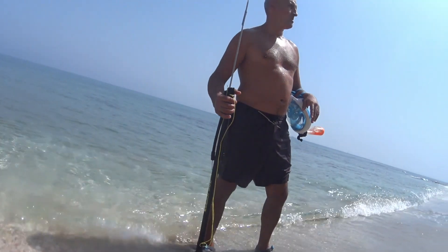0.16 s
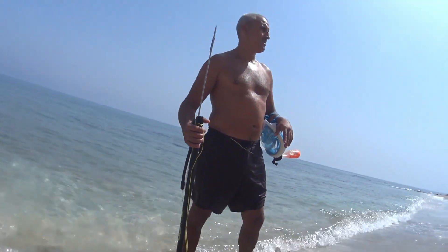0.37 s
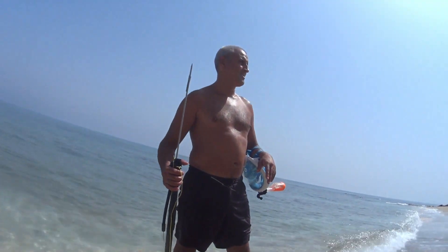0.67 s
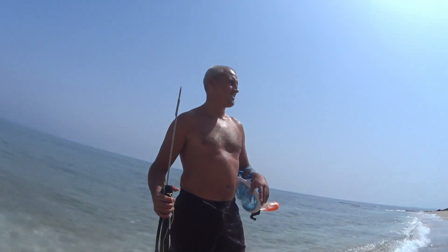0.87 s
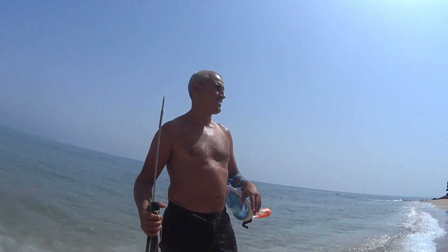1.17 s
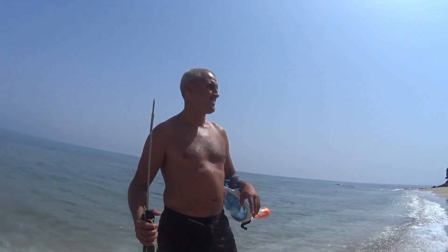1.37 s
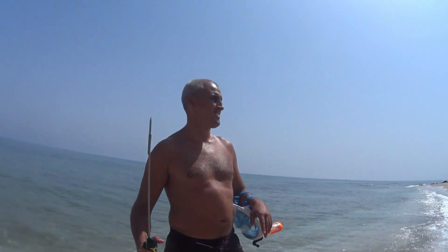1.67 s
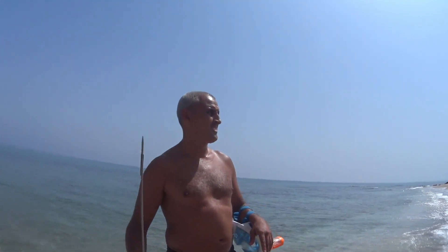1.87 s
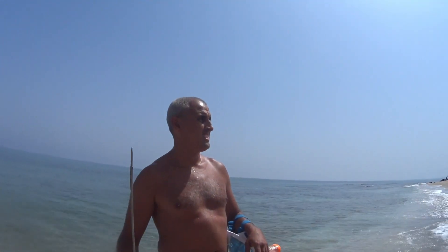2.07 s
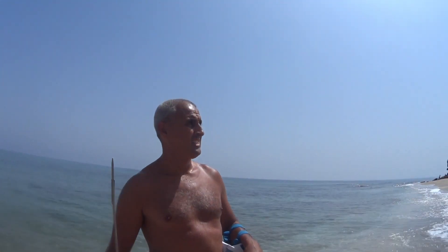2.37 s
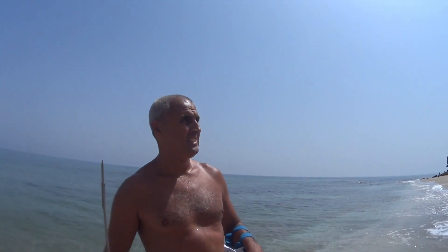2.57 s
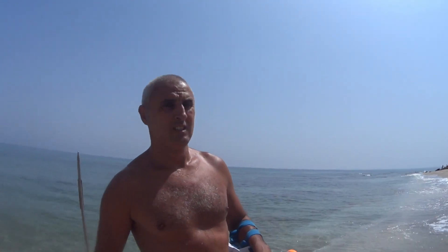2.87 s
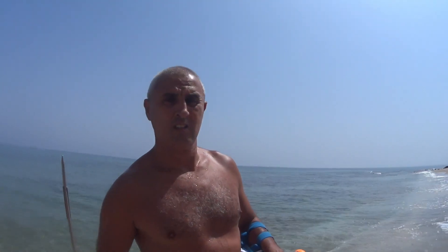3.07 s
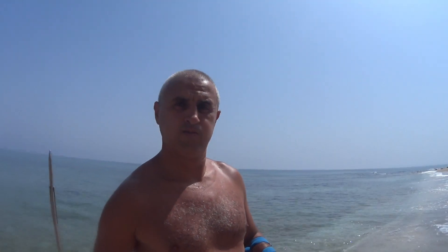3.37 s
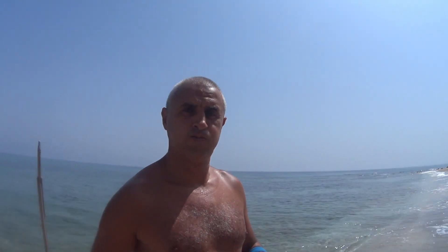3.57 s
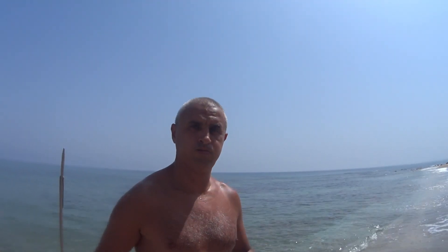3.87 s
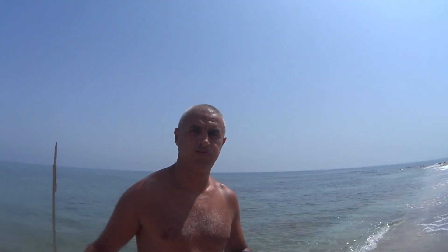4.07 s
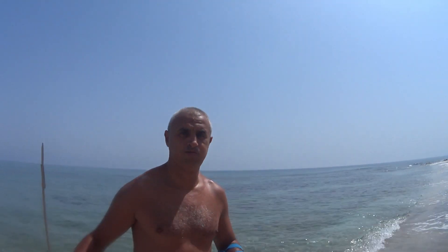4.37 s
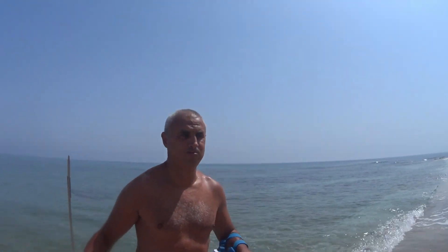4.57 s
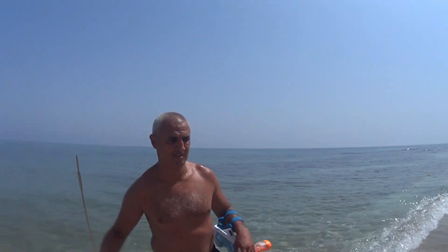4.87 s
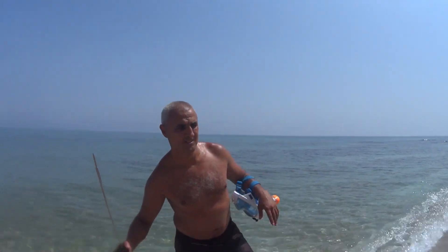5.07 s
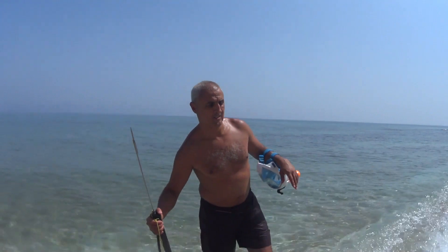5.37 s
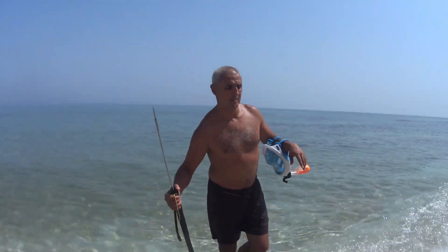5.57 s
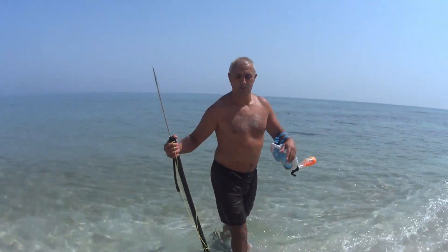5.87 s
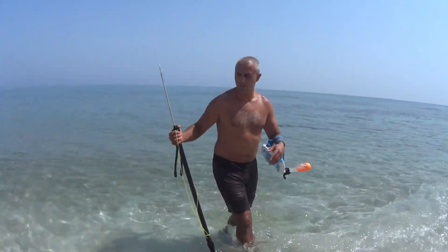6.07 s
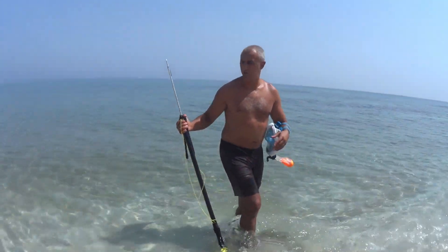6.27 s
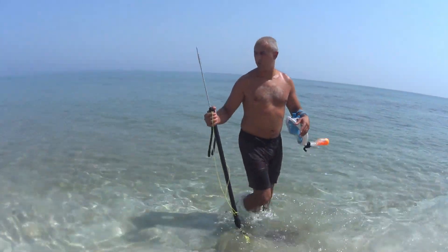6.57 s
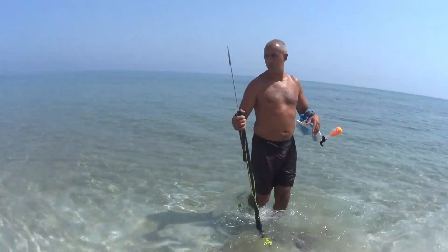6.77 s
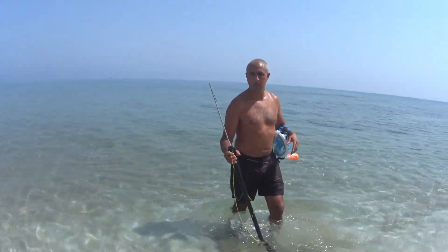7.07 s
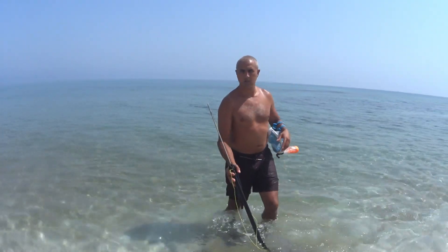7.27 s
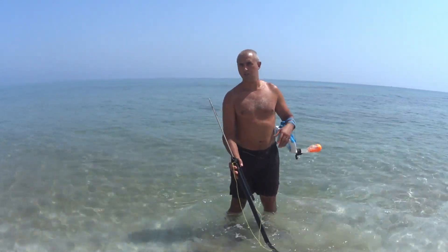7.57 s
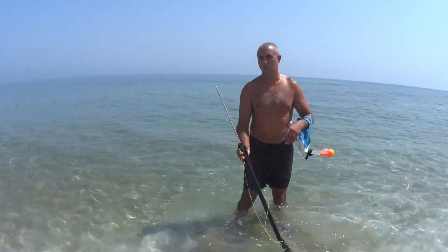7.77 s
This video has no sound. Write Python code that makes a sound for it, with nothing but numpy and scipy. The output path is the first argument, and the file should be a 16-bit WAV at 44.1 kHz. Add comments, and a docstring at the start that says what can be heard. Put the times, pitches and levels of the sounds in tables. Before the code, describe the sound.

A small wave breaks and drains on open sandy shore, then close splashing wading steps, gear clicks and clinks, and a second gentle wave near five seconds.

```python
"""A small wave breaks at once on a sandy beach, runs up and drains back: swarms of bubbles over filtered noise.
From about two seconds a man with a spear gun and a mask wades in: water slaps (noise bursts), gulps (rising
sines) and sloshes (bubbles) round his legs, his gear clicks and clinks, and the hand-held camera bumps softly.
Near five seconds a second wave breaks, and more strides, slaps and clicks follow as it drains.
Surf, sloshing, slaps and clicks are coloured by the two resonant microphone ports of the camera's housing."""
import sys
import numpy as np
from scipy import signal
from scipy.fft import rfft, irfft, next_fast_len
from scipy.io import wavfile
from scipy.ndimage import uniform_filter1d, map_coordinates

SR = 44100
rng = np.random.default_rng(int(sys.argv[2]) if len(sys.argv) > 2 else 0)


def inscribe(sig):
    """Save sig as 16-bit PCM at rate SR to the path in sys.argv[1].

    A 1-D sig is mono; a 2-D sig holds one channel per row.
    Samples are clipped to [-1, 1] before scaling.
    """
    pcm = np.round(np.clip(np.atleast_2d(sig).T, -1, 1) * 32767)
    wavfile.write(sys.argv[1], SR, pcm.astype(np.int16))


N = 348831

# waves on the sand: break_s, run_up_s, crest_db, ebb_db_per_s
WAVES = [(0.37, 0.82, -29, 24.5), (4.67, 1.155, -29.5, 13)]
# what a wave stirs up: share_db (against the wave at its crest), growth_db_per_db (of the wave),
# early_s (by which it comes and goes early)
CHURN_LAW = (-14, 1.1, 0.084)
WASH_LAW = (-1.13, 0.98, 0.029)
FIZZ_LAW = (-5.5, 1.077, 0.074)
FAR_LAW = (-16.5, 0.27, 0.13)

# colour of large bubbles, in surf and gurgles: freq_hz, level_db
CHURN_SPECTRUM = [(40, -30), (100, 6), (135, -5), (200, -3.5), (400, -0.5), (1050, 6.5), (1350, -20),
                  (2000, -28)]
# colour of small bubbles in the surf: freq_hz, level_db
WASH_SPECTRUM = [(600, -21), (1000, -13), (1350, 2), (1800, -4), (2800, -5.5), (3600, -9), (5500, -4),
                 (11000, -44)]
# colour of foam and fine spray: freq_hz, level_db
FIZZ_SPECTRUM = [(1500, -31), (2800, -8), (3800, -1), (5000, 1.5), (7500, 1.5), (11000, 1.5)]
# dull hush of surf farther along the shore: freq_hz, level_db
FAR_SPECTRUM = [(150, -4.5), (400, 0.5), (800, 3), (1350, 4), (1800, 3.5), (2500, -9), (4000, -3.5),
                (6000, 0.5), (11000, -2.5)]
# low handling rumble: freq_hz, level_db
RUMBLE_SPECTRUM = [(15, -18), (30, -1), (60, -3.5), (120, -6.5), (250, -9), (600, -21.5), (1500, -31)]
# dull bump on the housing: freq_hz, level_db
THUD_SPECTRUM = [(20, -16), (50, -3), (85, 2.5), (130, -3), (220, -22), (600, -35), (2000, -70)]
# dry contact of the gear: freq_hz, level_db
PLASTIC_SPECTRUM = [(500, -15), (1700, -11), (2400, -2), (3200, -11), (4350, 2.5), (5500, -1), (11000, -5)]
# drops thrown by a slap: freq_hz, level_db
SPATTER_SPECTRUM = [(200, -24), (800, -6.5), (1800, 8.5), (2700, 1), (3600, -5.5), (4500, -4),
                    (6000, -10.5), (11000, -23)]
# close bubbles round the legs: freq_hz, level_db
SLOSH_SPECTRUM = [(300, -24), (1000, -7), (1500, -10.5), (2000, -11), (2800, -8), (3600, -11.5),
                  (4500, -0.5), (5500, 2), (11000, -3.5)]

# resonant colour of the microphone ports: freq_hz, left_db, right_db
PORT_RESPONSE = [(95, -20.5, -15.5), (384, -3.5, -5), (720, -8, -4.5), (1040, -9.5, -10.5),
                 (1326, -14, -10.5), (1675, -9, -3.5), (1794, 2, 1), (2190, -1, -1), (2470, -1.5, 2.5),
                 (3060, -4, -7), (3920, -1, -0.5), (4455, -1, -1.5), (5120, -10.5, -10.5), (5820, -7, -5),
                 (7330, -12.5, -4), (8100, -21.5, -11), (8630, -21, -6.5), (9680, -24.5, -10.5),
                 (11700, -26, -15.5)]
# how the ports agree on the surf along the shore: freq_hz, coherence (0 to 1), left_lead_rad
SHORE = [(450, .9, 0), (850, .43, .9), (1150, .34, -.8), (1450, .69, .9), (1800, .95, .1), (2500, .86, .3),
         (2900, .1, 0), (3600, .5, 4), (4400, .7, 3.2), (5100, .34, 3.5), (5800, .87, 3.4),
         (7300, .73, 2.1), (9000, .62, 1.5), (10200, .36, -2.9)]
# how they agree on sounds in front: freq_hz, coherence (0 to 1), left_lead_rad
AHEAD = [(400, .5, .1), (1350, .3, -1.1), (1750, .96, .1), (2550, .92, .5), (3100, .45, -.1),
         (4400, .78, -1.6), (5200, .55, -2.2), (6000, .83, -3.2), (7500, .62, -4.2), (9000, .52, -4.9),
         (10200, .2, -8.8)]

# bumps on the housing: start_s, peak_db
BUMPS = [(1.801, -46), (1.927, -52), (2.489, -55), (2.604, -50), (3.071, -48), (3.177, -49), (3.664, -53),
         (3.836, -50), (5.708, -42.5), (6.203, -47.5), (6.367, -49), (6.759, -45), (7.587, -47)]
# dry clicks of the gear: start_s, peak_db, t60_s
CLICKS = [(2.414, -33.5, .014), (3.215, -41, .012), (3.857, -40, .02), (6.554, -26.5, 0.073),
          (6.5996, -18, 0.013), (6.836, -26, 0.061), (6.934, -33, .017), (7.046, -34, 0.011)]
# clinks of the steel spear: start_s, level_db, pitch_hz, t60_s, left_minus_right_db, hardness_db_per_octave
CLINKS = [(2.265, -28, 4470, 0.041, 2, 1), (3.388, -30.5, 3870, 0.048, -20, -1.5),
          (3.862, -25.5, 3890, 0.04, -13, -3), (4.016, -39, 3760, .05, -5, -10),
          (6.841, -20, 3760, 0.053, 19.5, 2)]
# modes of the spear: pitch_ratio, level_db, t60_share
STEEL_MODES = [(0.998, -7.5, 1.26), (0.995, -26, 4.5), (1.036, -8, 0.79), (1.09, -6.5, 0.32),
               (1.99, -24.5, .7), (2.79, -18, 0.57)]
# largest pockets of trapped air: start_s, level_db, pitch_hz (at the start)
GULPS = [(2.413, -29, 2090), (2.467, -30, 1144), (2.505, -34.5, 1310), (2.634, -39.5, 485),
         (4.276, -37, 736), (4.311, -39.5, 330), (4.433, -25.5, 1270), (4.51, -35, 543), (4.597, -30, 363),
         (4.637, -36, 455), (4.698, -27, 347), (4.715, -33, 460), (4.732, -32, 422), (7.861, -32.5, 1245),
         (7.884, -37, 503)]
# loudest slaps of water: slap_s, level_db, spray_db (against level_db), t60_s
SLAPS = [(1.961, -31, -7, 0.045), (2.081, -26, -15, .05), (2.298, -24, -18, 0.017),
         (2.369, -26, -10.5, 0.15), (2.414, -29, -9, .035), (2.468, -28.5, -10, 0.21),
         (2.701, -28.5, -25, 0.029), (2.854, -25.5, -21, 0.084), (2.897, -31.5, -30, 0.043),
         (3.2, -42.5, -14, .04), (4.164, -30.5, -2.5, 0.036), (4.305, -26.5, -25, .035),
         (4.434, -22, -2, 0.21), (4.705, -20.5, -5.5, 0.19), (6.682, -28, -22, .06),
         (7.089, -29, -26, 0.033), (7.331, -24, -27, 0.042), (7.396, -22, -22, .1),
         (7.464, -24.5, -18, 0.12), (7.863, -28.5, -36, 0.046)]
# strides through the shallows: fastest_s, slosh_db, swing_s, gurgle_db
STRIDES = [(2.12, -52, 0.29, -77), (2.5, -45.5, .45, -65), (2.865, -42, 0.31, -59), (6.45, -64, .4, -53),
           (6.78, -47, 0.6, -54), (7.09, -57, 0.17, -56), (7.5, -39, 0.43, -52.5)]

BUILD_DB_PER_S = 24  # a wave grows as it steepens towards the break
SWELL_DB, SWELL_S = 5, 0.56  # it breaks this far under its crest; time constant of the spreading foam
TURN_S = 0.42  # the water takes this long to turn back
BACKWASH_DB, BACKWASH_DB_PER_S = -16.5, 6  # draining water: level under the wave, fading as the wave ebbs
GULP_T60_S, GULP_HZ, GULP_DAMPING = 0.069, 350, 0.35  # ring time at this pitch; power shortening higher ones
SWING_DB, SETTLE_DB_PER_S = 14, 110  # the stir grows by this much over a swing, then settles
GURGLES_PER_S = 60  # air pockets that a leg drags under, per second in both streams together
TOP_HZ = 11060  # band limit of the camera


def amp(db):
    """Decibels to gain."""
    return 10 ** (np.asarray(db) / 20)


def unit(x):
    """x at rms 1."""
    return x / np.sqrt(np.mean(x ** 2) + 1e-20)


def at_peak(x, db):
    """x scaled so that its loudest two milliseconds have this level."""
    loudest = uniform_filter1d(np.mean(x ** 2, 0), SR // 500).max()
    return x * amp(db) / np.sqrt(loudest)


def along(points, hz):
    """(freq_hz, value) points read on a log frequency axis."""
    f, v = np.transpose(points)
    return np.interp(np.log(hz + 1), np.log(f + 1), v)


def wobble(rate):
    """A smooth random curve, rate knots a second."""
    knots = rng.standard_normal(int(N * rate / SR) + 4)
    return map_coordinates(knots, [np.arange(N) * rate / SR])


def add(track, s, sound):
    """Mix a sound into a track at time s."""
    part = track[..., round(s * SR):][..., :sound.shape[-1]]
    part += sound[..., :part.shape[-1]]


def fade(t, t60):
    """Free decay, 60 dB in t60 seconds."""
    return np.exp(-np.log(1000) * t / max(t60, 1e-3))


def coloured(x, spectrum):
    """x with a (freq_hz, level_db) spectrum laid on it."""
    n = x.shape[-1]
    m = next_fast_len(n + 2048)
    gain = amp(along(spectrum, np.fft.rfftfreq(m, 1 / SR)))
    return irfft(rfft(x, m) * gain, m)[..., :n]


def ports(pair, spectrum, direction):
    """Two unrelated signals become left and right of one source, coloured by the ports."""
    n = pair.shape[-1]
    m = next_fast_len(n + 2048)
    hz = np.fft.rfftfreq(m, 1 / SR)
    response, agree = np.array(PORT_RESPONSE), np.array(direction)
    # the mixing angle sets the coherence, the phase sets which port leads
    turn = np.arccos(np.clip(along(agree[:, :2], hz), 0, 1)) / 2
    lead = np.exp(.5j * along(agree[:, ::2], hz))
    a, b = rfft(pair, m) * amp(along(spectrum, hz))
    shared, apart = a * np.cos(turn), b * np.sin(turn)
    left = (shared + apart) * lead * amp(along(response[:, :2], hz))
    right = (shared - apart) / lead * amp(along(response[:, ::2], hz))
    return irfft(np.array([left, right]), m)[:, :n]


def bubbles(rate, low_hz, high_hz, cycles, spread_db, size):
    """Two streams of ringing bubbles: many faint, a few strong, each rising in pitch as it dies."""
    when, pitch, strength, life = rng.random((int(rate * N / SR), 4)).T[:, :, None]
    hz = low_hz * (high_hz / low_hz) ** pitch
    turns = hz * np.arange(size) / SR
    age = turns / (cycles * (.5 + life))  # 1 when 60 dB down
    gain = amp(-spread_db * np.log(np.maximum(strength, .01)))
    tone = np.sin(2 * np.pi * turns * (1 + 0.026 * np.minimum(age, 2)))
    onset = 1 - np.exp(-2 * turns)
    rings = gain * tone * np.exp(-np.log(1000) * age) * onset
    # both streams are laid end to end, then folded into two rows
    at = (when * 2 * N).astype(int) + np.arange(size)
    return unit(np.bincount(at.ravel(), rings.ravel(), 2 * N)[:2 * N].reshape(2, N))


def water(grains, spectrum, direction, blur_db, patchy_db):
    """Near bubbles with a noise blur of far ones, in patches of time and pitch; the mono sum has rms 1."""
    mixed = grains + amp(blur_db) * rng.standard_normal((2, N))
    z = signal.stft(mixed, nperseg=512)[2]
    field = uniform_filter1d(rng.standard_normal(z.shape[1:]), 7, 0)
    field = uniform_filter1d(field, 7, 1)
    patchy = signal.istft(z * amp(patchy_db * unit(field)), nperseg=512)[1][:, :N]
    pair = ports(patchy, spectrum, direction)
    return pair / np.sqrt(np.mean(pair.mean(0) ** 2))


def patter(n, rough_db):
    """Two streams of tiny noise impacts of uneven size, n samples long."""
    sizes = np.repeat(rng.standard_normal(n // 32 + 1), 32)[:n]
    return unit(rng.standard_normal((2, n)) * amp(rough_db * np.clip(sizes, -2, 1.5)))


def sea_state(t):
    """Strength of the surf in dB: each wave builds, breaks, runs up the sand, ebbs and drains back."""
    power = np.zeros(len(t))
    for breaks, run_s, crest_db, ebb_db_per_s in WAVES:
        before, after = np.maximum(breaks - t, 0), np.maximum(t - breaks, 0)
        ebbing = np.maximum(after - run_s, 0)
        rise_db = crest_db - BUILD_DB_PER_S * before - SWELL_DB * np.exp(-after / SWELL_S)
        ebb_db = uniform_filter1d(ebb_db_per_s * ebbing, max(int(TURN_S * SR), 1), mode="nearest")
        backwash_db = rise_db + BACKWASH_DB - BACKWASH_DB_PER_S * ebbing
        power += amp(rise_db - ebb_db) ** 2 + amp(backwash_db) ** 2
    return 10 * np.log10(power + 1e-20)


def stirred(law):
    """Gain of one layer of the surf, which follows the strength of the waves."""
    share_db, growth, early_s = law
    wave_db = sea_state(np.arange(N) / SR + early_s)
    crest_db = wave_db.max()
    return amp(crest_db + share_db + growth * (wave_db - crest_db))


def surf():
    """Large bubbles churn, small ones wash, foam fizzes; all three surge together over the hush of farther surf."""
    surge_db = 0.49 * wobble(14) + .4 * wobble(60)
    hush_db = 1.4 * wobble(11) + 0.74 * wobble(45)
    large = bubbles(1000, 142.2, 1170, cycles=13.0, spread_db=0.0, size=1600)
    small = bubbles(3000, 1104, 3650, cycles=32.4, spread_db=1.0, size=600)
    foam = bubbles(6000, 2830, 10450, cycles=15, spread_db=2, size=160)
    churn = water(large, CHURN_SPECTRUM, SHORE, blur_db=8.5, patchy_db=1.0)
    wash = water(small, WASH_SPECTRUM, SHORE, blur_db=10, patchy_db=1.02)
    fizz = water(foam, FIZZ_SPECTRUM, SHORE, blur_db=4, patchy_db=1.05)
    hush = unit(ports(rng.standard_normal((2, N)), FAR_SPECTRUM, SHORE))
    # the finer the bubbles, the more they surge
    return (stirred(CHURN_LAW) * amp(.5 * surge_db) * churn
            + stirred(WASH_LAW) * amp(surge_db) * wash
            + stirred(FIZZ_LAW) * amp(1.85 * surge_db) * fizz
            + stirred(FAR_LAW) * amp(hush_db) * hush)


def handling():
    """A low uneven rumble, nearly alike in both ports, and dull bumps of the hand on the housing."""
    shared, apart = unit(coloured(rng.standard_normal((2, N)), RUMBLE_SPECTRUM))
    apart = amp(-12) * apart
    out = amp(-63 + 1.6 * wobble(11)) * np.array([shared + apart, shared - apart])
    t = np.arange(SR // 4) / SR
    for s, db in BUMPS:
        noise = unit(coloured(rng.standard_normal(len(t)), THUD_SPECTRUM))
        thud = noise * fade(t, 0.08) * (1 - np.exp(-t / .008))
        add(out, s, at_peak(thud[None], db))
    return out


def gear():
    """Dry clicks, and clinks in which close modes of the spear beat; the upper ones die first, so the pitch sinks."""
    out, t = np.zeros((2, N)), np.arange(SR // 5) / SR
    for s, db, t60 in CLICKS:
        contact = patter(len(t), rough_db=2.5) * fade(t, t60)
        add(out, s, at_peak(ports(contact, PLASTIC_SPECTRUM, AHEAD), db))
    onset = 1 - np.exp(-t / 0.00098)
    for s, db, hz, t60, pan_db, hard_db in CLINKS:
        ring = np.zeros(len(t))
        for ratio, mode_db, share in STEEL_MODES:
            tone = np.sin(2 * np.pi * (hz * ratio * t + rng.random()))
            ring += amp(mode_db + hard_db * np.log2(ratio)) * tone * fade(t, t60 * share)
        sides = amp([[db + pan_db / 2], [db - pan_db / 2]])
        add(out, s, sides * ring * onset)
    return out


def gulps():
    """Trapped pockets of air ring and rise in pitch, with a puff of water around them; large ones ring longest."""
    out, t = np.zeros(N), np.arange(SR // 4) / SR
    onset = 1 - np.exp(-t / 0.0019)
    for s, db, hz in GULPS:
        t60 = GULP_T60_S * (GULP_HZ / hz) ** GULP_DAMPING
        ring = np.sin(2 * np.pi * hz * t * (1 + 1.1 * t))
        puff_spectrum = [(hz / 4, -30), (hz / 2, -4), (hz, 0), (hz * 3, -35)]
        puff = unit(coloured(rng.standard_normal(len(t)), puff_spectrum))
        add(out, s, amp(db - 1.5) * (ring + 0.39 * puff) * fade(t, t60) * onset)
    return out


def slaps():
    """Water gathers, slaps, and throws a spatter of drops and a finer spray."""
    lead = SR // 25  # samples of gathering before the slap
    out, t = np.zeros((2, N)), np.arange(-lead, SR // 6) / SR
    gather = amp(-13) * fade(abs(t), .08)
    for s, db, spray_db, t60 in SLAPS:
        shape = np.where(t < 0, gather, fade(abs(t), t60))
        drops = patter(len(t), rough_db=0.5) * shape
        drops = at_peak(ports(drops, SPATTER_SPECTRUM, AHEAD), db - 6.5)
        spray = patter(len(t), rough_db=3) * shape
        spray = at_peak(ports(spray, FIZZ_SPECTRUM, SHORE), db + spray_db)
        add(out, s - lead / SR, drops + spray)
    return out


def wading():
    """Each stride stirs up clumps of close bubbles and low gurgles, swelling with the leg, then settling fast."""
    t, stir, drag = np.arange(N) / SR, np.zeros(N), np.zeros(N)
    for s, slosh_db, swing_s, gurgle_db in STRIDES:
        growing_db = -SWING_DB * np.maximum(s - t, 0) / swing_s
        settling_db = -SETTLE_DB_PER_S * np.maximum(t - s, 0)
        swing = amp(growing_db + settling_db)
        stir += amp(slosh_db) * swing
        drag += amp(gurgle_db) * swing
    clumps = amp(wobble(45))
    close = bubbles(1300, 1200, 5000, cycles=22, spread_db=2.7, size=600)
    slosh = water(close, SLOSH_SPECTRUM, AHEAD, blur_db=-4, patchy_db=2)
    pockets = bubbles(GURGLES_PER_S, 282, 980, cycles=28, spread_db=0.5, size=3000)
    gurgle = water(pockets, CHURN_SPECTRUM, AHEAD, blur_db=12, patchy_db=2)
    return clumps * (stir * slosh + drag * gurgle)


def scene():
    """All sources simply add: the open beach has no echo."""
    return surf() + handling() + gear() + gulps() + slaps() + wading()


def record(dry):
    """A very steep low-pass: the camera keeps next to nothing above its band limit."""
    m = next_fast_len(N + 8192)
    hz = np.fft.rfftfreq(m, 1 / SR)
    return irfft(rfft(dry, m) / np.sqrt(1 + (hz / TOP_HZ) ** 240), m)[:, :N]


dry = scene()
out = record(dry)
inscribe(out)
```